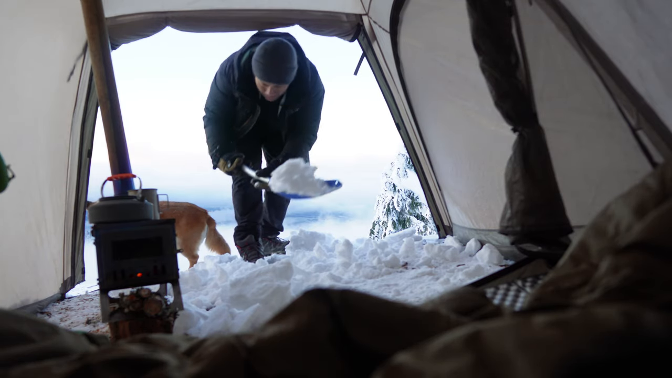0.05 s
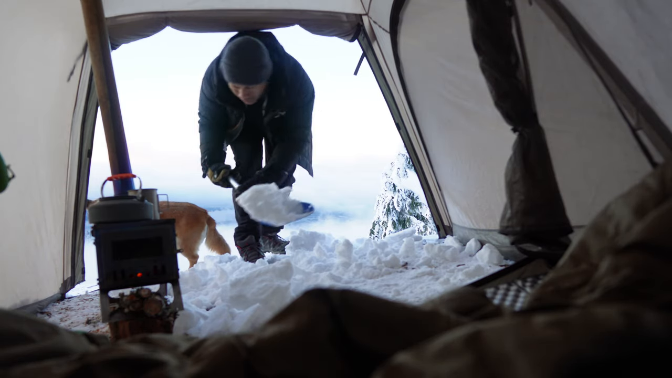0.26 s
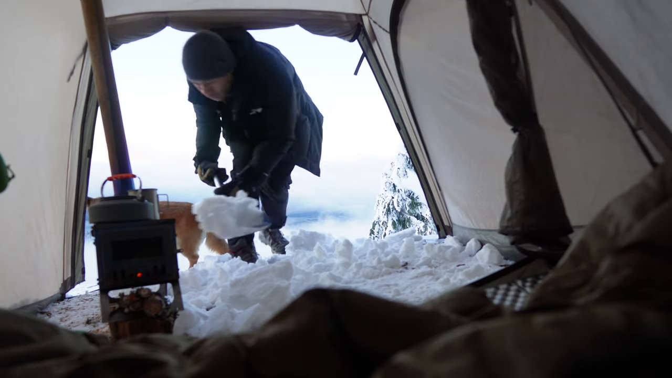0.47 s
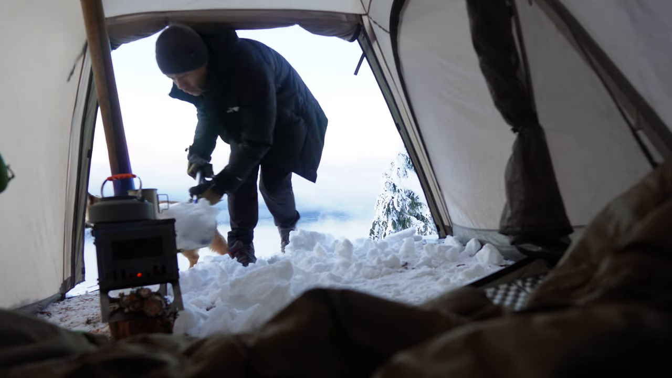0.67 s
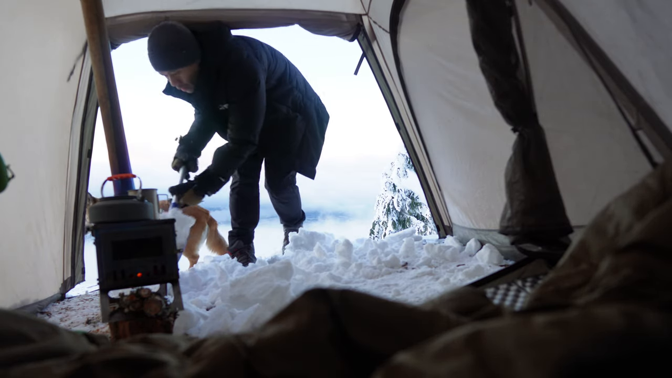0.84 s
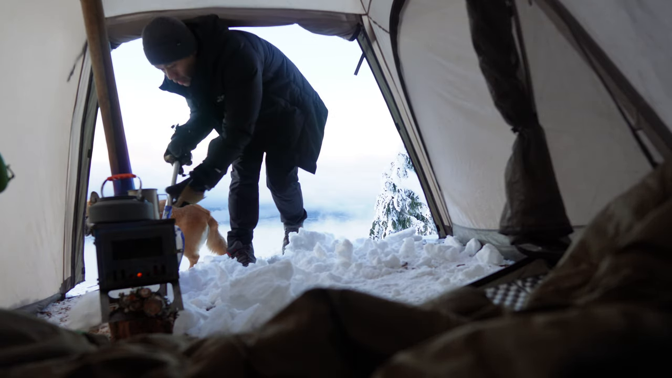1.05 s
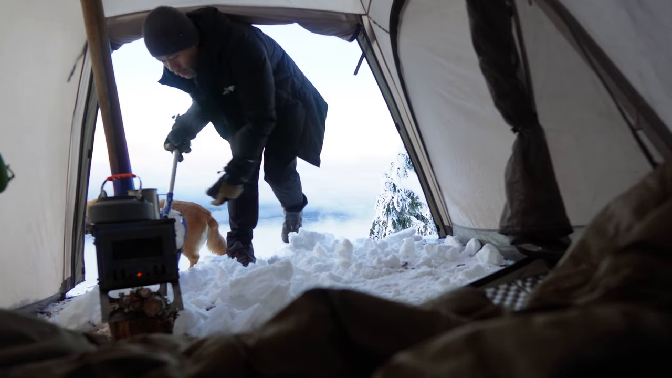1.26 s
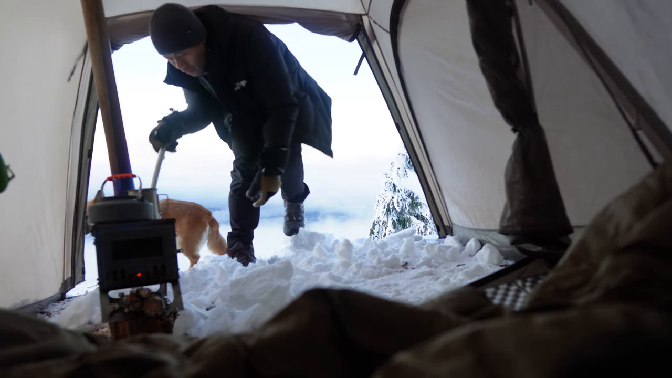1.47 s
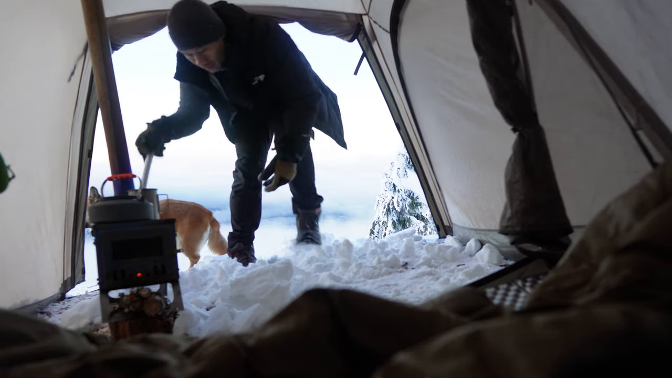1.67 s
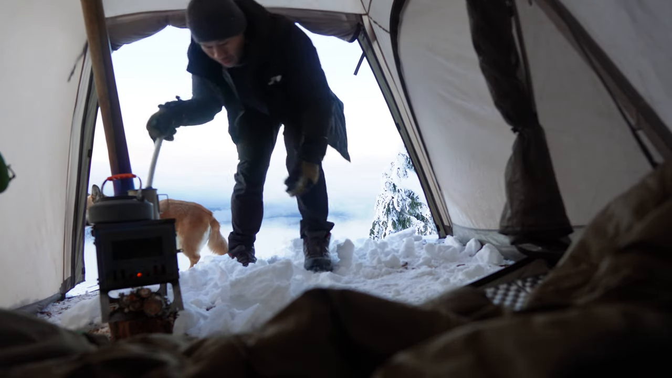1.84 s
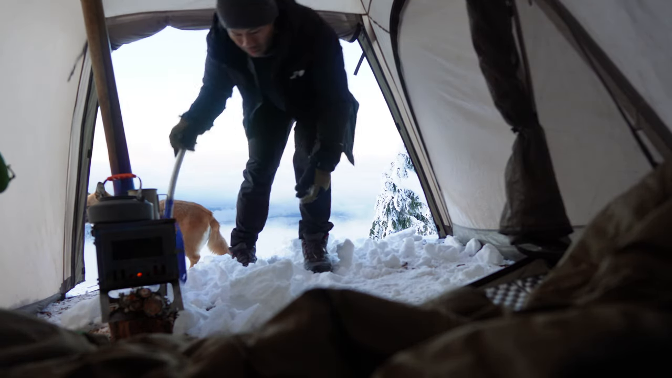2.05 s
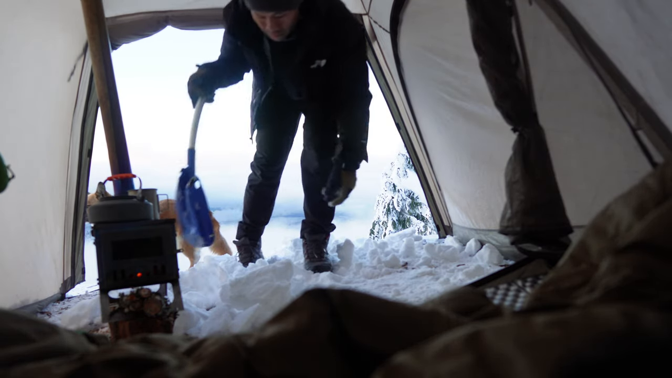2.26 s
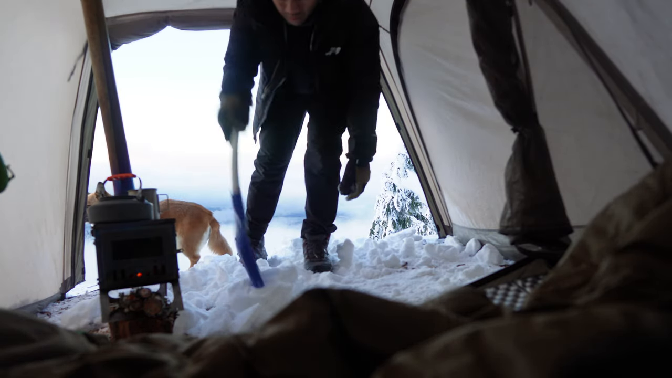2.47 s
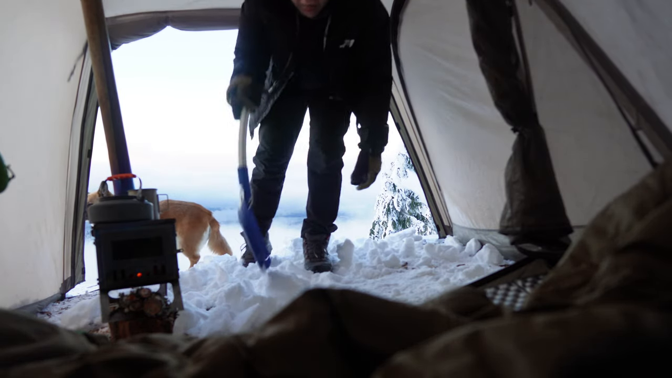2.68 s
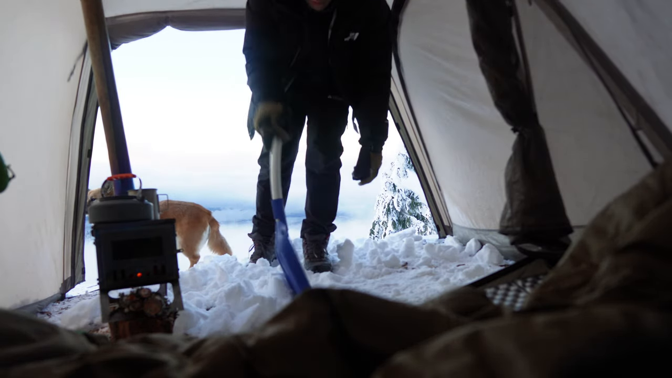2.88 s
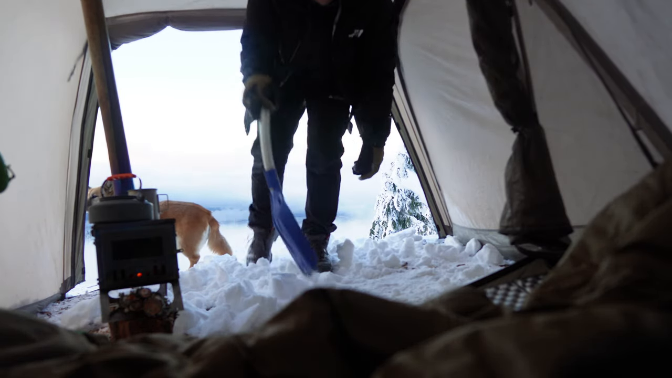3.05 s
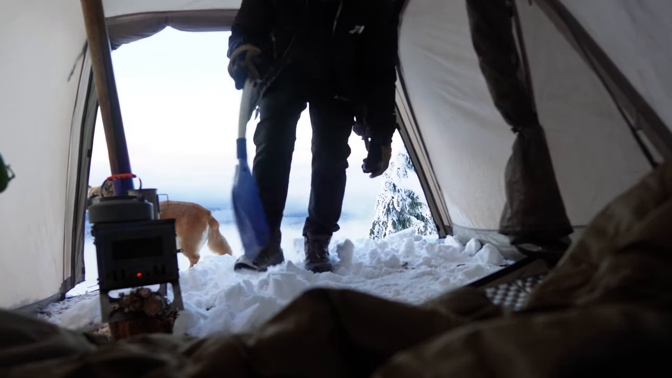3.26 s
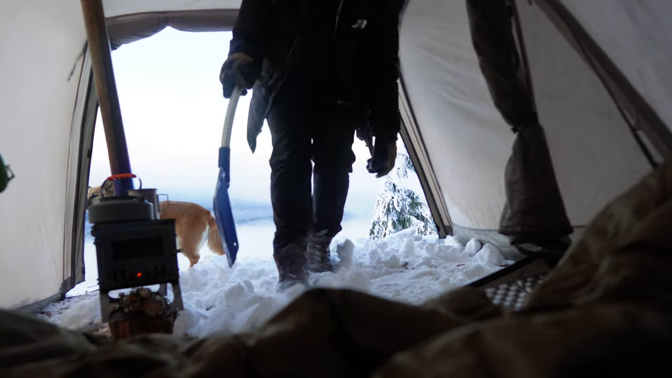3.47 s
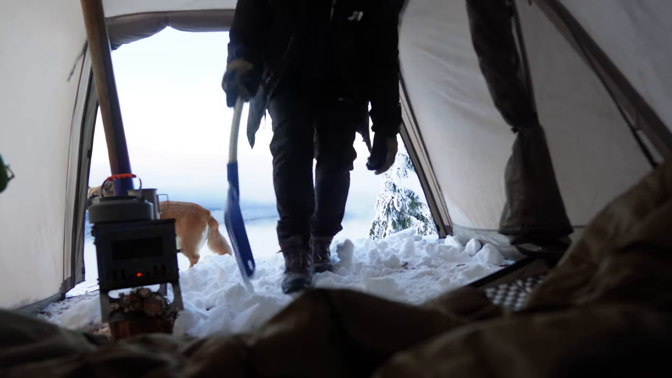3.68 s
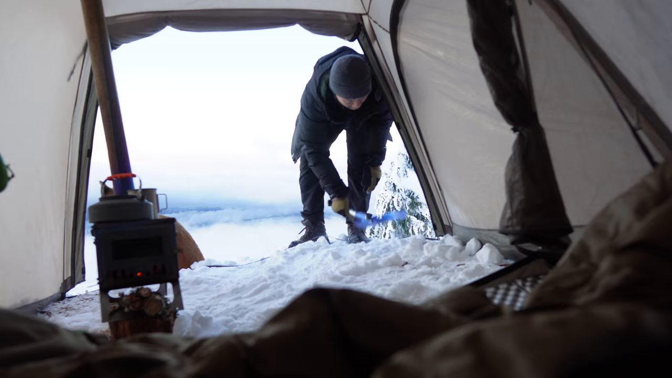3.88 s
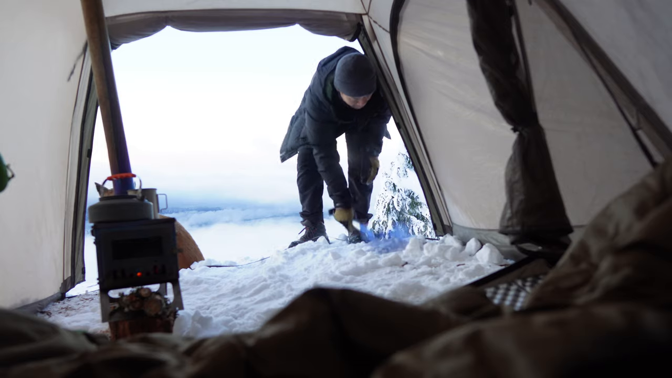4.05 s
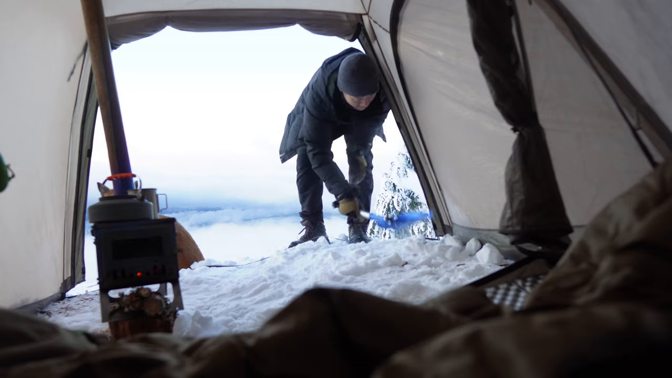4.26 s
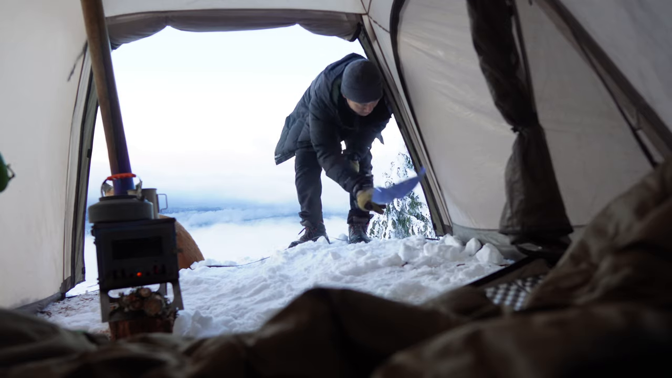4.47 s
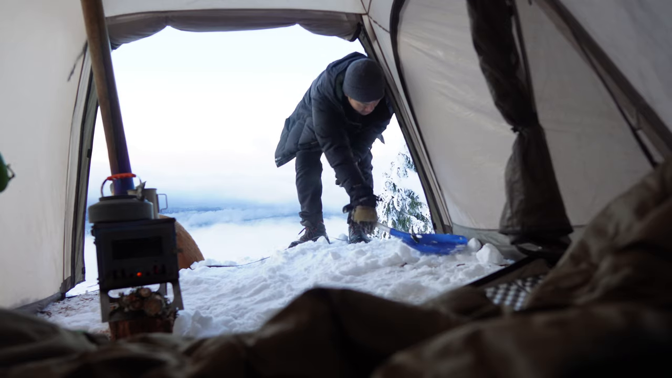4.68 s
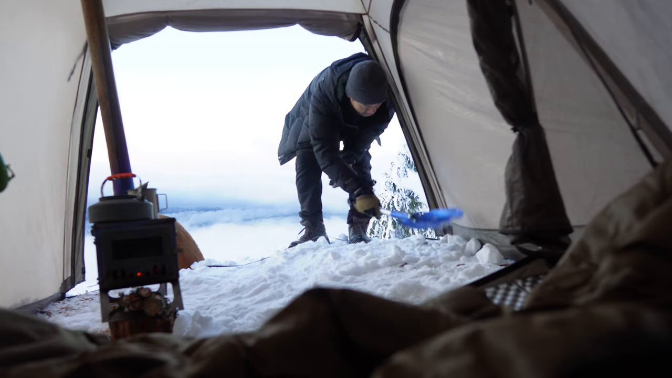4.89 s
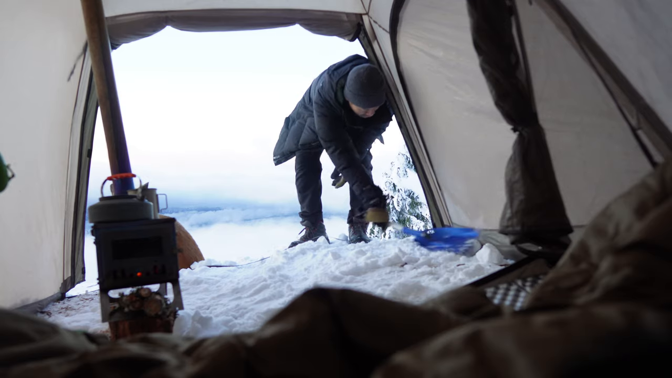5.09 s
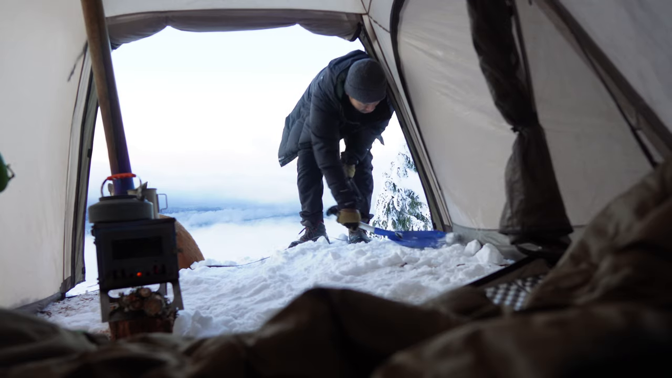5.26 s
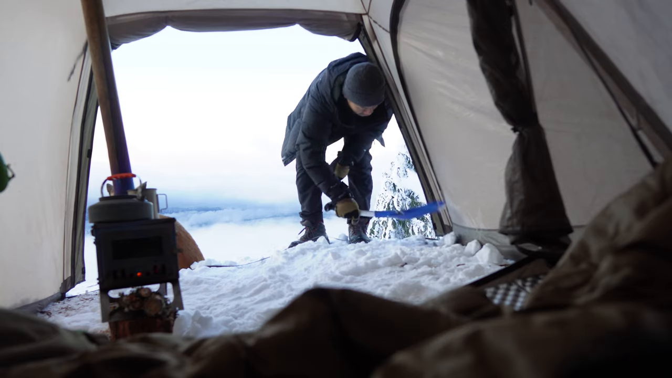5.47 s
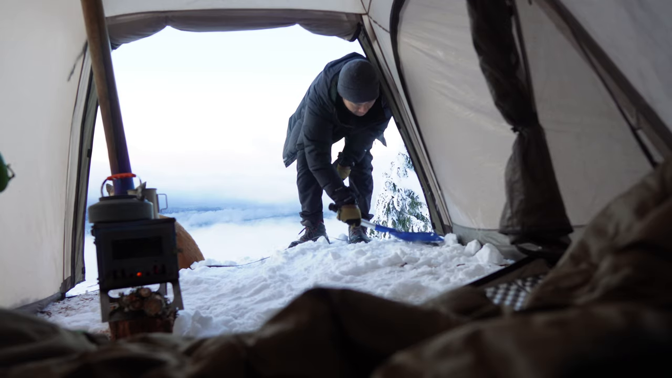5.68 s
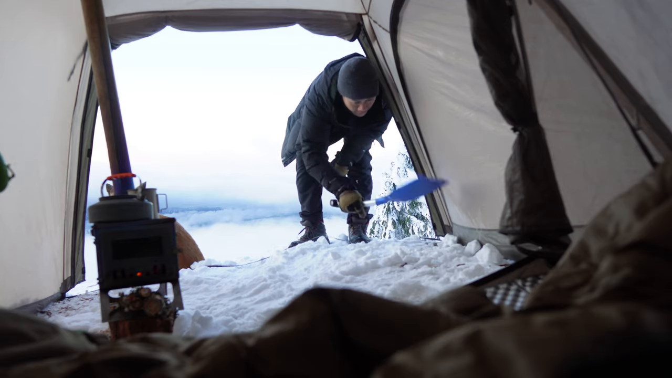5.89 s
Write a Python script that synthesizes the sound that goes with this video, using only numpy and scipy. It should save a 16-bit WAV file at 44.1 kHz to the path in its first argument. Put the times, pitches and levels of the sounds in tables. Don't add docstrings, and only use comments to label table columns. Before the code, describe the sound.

Close, dry mono pickup from inside a canvas tent in still winter air. For about a second and a half only faint snow rustles, soft boot crunches and light blade touches. Then a metal shovel bites hard into crusty snow, scraping and chopping irregularly, with short metallic rings, ice snaps and low thuds, growing busiest towards the end before dying away.

```python
import sys
import numpy as np
from scipy import signal
from scipy.io import wavfile

SR = 44100
rng = np.random.default_rng(int(sys.argv[2]) if len(sys.argv) > 2 else 0)


def wrap_up_sound(samples):
    columns = np.atleast_2d(samples).T
    tamed = np.clip(columns, -1, 1)
    steps = np.round(tamed * 32767).astype(np.int16)
    wavfile.write(sys.argv[1], SR, steps)


def gain_from_decibels(decibels):
    exponent = np.asarray(decibels, float) / 20
    return 10 ** exponent


N = 261513

# [t/s, peak level/dB, body re peak/dB, sparkle re peak/dB]
EDGE_BITES = [(1.5365, -14.5, -9, -37), (1.625, 5, -13, -36), (2.024, 2.5, -45, -27.5),
              (2.43, -14.5, -34, -21), (2.582, -1, -24, -22), (2.6016, -5.5, -16.5, -21),
              (2.808, -17.5, -13, -31), (2.9517, 1.5, -17, -17.5), (3.2845, -17, -11, -18.5),
              (3.5648, -13, -15, -40), (3.7534, -9.5, -21, -32), (3.7818, -8.5, -15, -10.5),
              (3.8488, 2, -16.5, -24.5), (3.9983, -10, -10, -27.5), (4.133, -3.5, -17, -16.5),
              (4.228, -1.5, -13.5, -22.5), (4.4217, -6, -21, -27.5), (4.678, -1.5, -18, -9.5),
              (4.7452, -8.5, -17, -16), (4.79, -13, -31, -22), (4.8182, -5.5, -8, -18.5),
              (5.1237, -5.5, -11.5, -36), (5.162, -2.5, -14, -24), (5.263, -12.5, -14, -10),
              (5.39, -5.5, -8.5, -17), (5.452, -17, -22, -9.5), (5.531, -7.5, -10.5, -23.5),
              (5.6523, 5.5, -25, -27), (5.701, -10.5, -21, -18), (5.7298, -4.5, -15, -24)]
# [t/s, peak level/dB, sparkle re peak/dB]
EDGE_TAPS = [(0.829, -26.5, -51), (0.9285, -23, -34), (0.9444, -26, -32), (1.121, -19, -9.5),
             (1.198, -28, -10), (1.462, -21, -41), (2.7602, -16.5, -39), (3.0596, -17, -31),
             (3.201, -28, -39), (3.248, -31, -36), (3.3737, -28, -2), (4.066, -22.5, -36), (4.343, -40, 1),
             (4.5164, -18, -45), (4.6144, -24.5, -44), (5.07, -25, -33), (5.854, -32, -38),
             (5.9254, -25, -51)]
# [t/s, level/dB]
BLADE_FREEDOM = [(0, -9.5), (1.4, 0), (2.4, 2.5), (2.6, -2.5), (2.88, 4), (3.0, 2), (3.3, 7), (3.45, -0.5),
                 (3.7, -3), (3.85, 3), (5.1, 3), (5.3, 7), (5.93, -6)]


def in_time(rows):
    s, *columns = np.transpose(rows)
    t = np.arange(N) / SR
    return np.array([np.interp(t, s, column) for column in columns])


def at_hz(points, hz):
    table_hz, table_db = np.array(points).T
    return np.interp(np.log(hz), np.log(table_hz), table_db)


def drift(rate_hz):
    r = np.exp(-32 * np.pi * rate_hz / SR)
    noise = rng.standard_normal(N // 16 + 2002)
    slow = signal.lfilter([1], [1, -2 * r, r * r], noise)[2000:]
    return np.interp(np.arange(N) / 16, np.arange(len(slow)), slow / slow.std())


def resonate(x, hz, width_hz):
    r = np.exp(-np.pi * width_hz / SR)
    poles = [1, -2 * r * np.cos(2 * np.pi * hz / SR), r * r]
    return signal.lfilter([(1 - r * r) / 2, 0, (r * r - 1) / 2], poles, x)


def add(out, s, piece):
    i = round(s * SR)
    out[..., i:i + piece.shape[-1]] += piece[..., :out.shape[-1] - i]


def zone_powers(edge_db, body_db, sparkle_db):
    zones_db = np.array([body_db + 15.0, body_db + 12.5, edge_db, sparkle_db + 12, sparkle_db + 13.0])
    return gain_from_decibels(2 * zones_db)


def sliding():
    # [t/s, level/dB, dryness (adds sparkle)/dB]
    settling = [(0.07, -34.5, -17), (.17, -38, -18), (.26, -44, -4), (.62, -38.5, -3.5), (.8, -43, -2),
                (1.3, -41.5, 2.5), (1.52, -43.5, 3), (2.44, -36, -1.5), (2.7, -40, -1.5), (3.1, -39.5, -4),
                (3.35, -47.5, 3), (3.55, -40.5, 1.5), (3.75, -36.5, -3), (3.93, -52, -15), (4.12, -54, -8),
                (4.5, -44.5, -3.5), (5.11, -44, -19), (5.6, -51, -12)]
    # [start/s, length/s, level/dB, body re level/dB, sparkle re level/dB]
    drags = [(0.0, 0.029, -30.5, -11.5, -18.5), (0.335, 0.22, -35.5, -14.5, -33),
             (0.723, 0.022, -37, -31, -22), (0.97, .06, -38.5, -24, -25), (1.05, 0.13, -33.5, -16, -17.5),
             (1.599, 0.016, -19.5, -32, -20.5), (1.686, 0.15, -28.5, -18.5, -14.5),
             (1.845, .2, -28.5, -8, -15), (3.41, 0.074, -39.5, -8.5, -20), (2.045, 0.13, -26, -19.5, -20.5),
             (2.154, 0.15, -34.5, -6.5, -10.5), (2.85, .04, -29.5, -31, -33),
             (2.919, 0.073, -19, -20.5, -29), (3.433, 0.045, -29.5, -10, -17.5),
             (4.024, 0.053, -36, -12.5, -22.5), (5.201, 0.15, -19.5, -21.5, -18),
             (5.713, 0.065, -26, -39, -21)]
    rise_db_per_s, fall_db_per_s, sag_db_per_s = 293, 235, -7.5
    usual_db, body_db, sparkle_db = -42.5, -52, -15.5

    level_db, dryness_db = in_time(settling)
    power = zone_powers(level_db, body_db + level_db - usual_db, level_db + sparkle_db + dryness_db)
    t = np.arange(-SR // 4, SR * 3 // 4) / SR
    padded = np.zeros((len(power), N + SR))
    for s, length_s, db, drag_body_db, drag_sparkle_db in drags:
        rise_db = rise_db_per_s * np.minimum(t, 0)
        sag_db = sag_db_per_s * np.maximum(t, 0)
        fall_db = fall_db_per_s * np.maximum(t - length_s, 0)
        shape_db = db + rise_db - sag_db - fall_db
        zones = zone_powers(0, drag_body_db, drag_sparkle_db)[:, None]
        add(padded, max(s, 0), gain_from_decibels(2 * shape_db) * zones)
    return power + padded[:, SR // 4:SR // 4 + N]


def pressure_db(bite_push_s, crump_db, fizz_db):
    # [t/s, peak level/dB, body re peak/dB, sparkle re peak/dB, t60/s]
    shoves = [(1.0744, -19.5, -13, -22, 0.12), (1.5666, -11.5, -14.5, -26, 0.31),
              (1.6494, -4.5, -19, -28, 0.018), (1.9796, 2, -31, -26.5, 0.19), (2.044, -21.5, 2, -11, 0.032),
              (2.4952, 1.5, -27, -20, 0.19), (2.5374, -2.5, -31, -32, 0.13), (2.6244, -16, -16, -27, 0.17),
              (2.846, -8.5, -21, -12.5, 0.28), (2.884, -12.5, -16.5, -20, 0.17),
              (2.9754, -2.5, -18, -22, 0.049), (3.395, -21.5, -26, -6, 0.2), (3.4426, -27, 0.5, -19, 0.15),
              (3.7964, -4, -45, -32, 0.12), (4.1447, -7.5, -11, -16.5, 0.16), (4.2044, -13, -20, -24, 0.1),
              (4.2694, -15.5, -27, -15.5, 0.13), (4.3824, -27.5, -26, -11, 0.097),
              (4.6906, -4, -19, -19.5, 0.31), (4.999, -20.5, -6, -28, 0.16), (5.135, -6, -18, -9.5, 0.16),
              (5.203, -10, -17.5, -35, 0.27), (4.672, -16, -10, -25, .05), (2.49, -24, -25, -20, .05),
              (2.838, -15, -17, -15, .05), (5.4144, -27, -26, -17, 0.15), (5.565, -24, -16, -30, .1),
              (5.7683, -14.5, -27, -14.5, 0.043)]
    bite_t60_s, tap_t60_s, tap_body_db = 0.091, 0.074, -11
    bite_rise_s, shove_rise_s, shove_push_s = .0018, .005, .019

    power = sliding()
    t = np.arange(SR // 2) / SR
    fading = np.array([[.9], [.9], [1], [1.15], [1.2]])
    bites = [(*row, bite_t60_s) for row in EDGE_BITES]
    bites += [(s, db, tap_body_db, sparkle_db, tap_t60_s) for s, db, sparkle_db in EDGE_TAPS]
    for rows, rise_s, push_s in (bites, bite_rise_s, bite_push_s), (shoves, shove_rise_s, shove_push_s):
        for s, db, body_db, sparkle_db, t60_s in rows:
            decay = gain_from_decibels(-60 * fading * np.maximum(t - push_s, 0) / max(t60_s, .01))
            shape = (1 - np.exp(-t / rise_s)) * decay
            low_db, high_db = body_db + 13, sparkle_db + 13.5
            zones_db = np.array([[low_db + crump_db], [low_db], [0], [high_db], [high_db + fizz_db]])
            add(power, s - .0025, (shape * gain_from_decibels(db - 8 + zones_db)) ** 2)
    return 10 * np.log10(power)


def crunch(strength_db, cycles, uneven_db, clump_db, patchy_db, blotchy_db, chip_db, fine):
    # [f/Hz, level per Hz/dB]
    spectrum = [(71, -35), (120, -21), (217, -8), (301, -7), (427, -7.5), (535, -12), (1030, -4.5),
                (1490, -9), (1830, -4.5), (2990, -2.5), (3520, -2.5), (5190, -3), (7980, -4.5),
                (14400, -24), (16000, -12)]
    zone_hz = [220, 850, 3200, 11000, 16000]
    # [t/s, power]
    thinness_curve = [(0, 1.4), (1.0, 1.7), (1.6, 0.89), (2.0, 1.25), (2.2, 1.2), (2.45, 2.9), (2.68, 3),
                      (2.85, 0.97), (3.3, 1.2), (3.7, 1.6), (4.1, 1.4), (4.7, 2), (5.12, 1.2), (5.3, 1.6),
                      (5.65, 1.1), (5.93, 1)]
    cracks_per_s = 40000

    pitches_hz = np.geomspace(130, 16500, 40)
    dealt = rng.integers(0, len(pitches_hz), N)
    clumps_db = clump_db * drift(55)
    sizes = gain_from_decibels(uneven_db * np.minimum(rng.exponential(1, N), 5)) * rng.choice([-1, 1], N)
    cracks = sizes * (rng.random(N) < cracks_per_s / SR)
    rarity = rng.random(N)
    thinness = np.clip(in_time(thinness_curve)[0], .5, 4)
    gains = gain_from_decibels(at_hz(spectrum, pitches_hz))
    gains = .92 * gains / np.sqrt(np.sum(gains ** 2 * pitches_hz / cycles * np.pi / SR))
    out = 0
    for k, hz in enumerate(pitches_hz):
        place = np.interp(np.log(hz), np.log(zone_hz), np.arange(len(zone_hz)))
        low = min(int(place), len(zone_hz) - 2)
        upper = (place - low) ** (thinness if low == 1 else 1)
        db = strength_db[low] * (1 - upper) + strength_db[low + 1] * upper
        own = cracks * (dealt == k) * (rarity < hz / 1800)
        own = own + fine * min(hz / 9000, 1) ** 2 * np.roll(sizes, 997 * k)
        level_db = db + clumps_db + patchy_db * drift(44) + blotchy_db * drift(4.1)
        own = own / own.std() * gain_from_decibels(level_db) + 1e-18
        chips = own * gain_from_decibels(chip_db + 8.2 * np.minimum(drift(8.9), 0.9))
        rings = resonate(own, hz, hz / cycles) + resonate(chips, 1.068 * hz, hz / 20)
        out = out + (-1) ** k * gains[k] * rings
    return out


def hollows(snow):
    # [middle/s, half length/s, f/Hz, level re crunch/dB]
    hollow_rows = [(0.323, 0.056, 2570, 0), (.54, 0.081, 2600, 3.5), (1.66, 0.011, 3240, 7),
                   (1.745, 0.071, 1260, 5), (2.2, 0.081, 1960, 7), (2.52, 0.035, 2350, 4),
                   (2.592, .012, 2160, 6), (3.8, 0.057, 3000, 1.5), (4.236, .04, 3080, 3),
                   (5.395, .015, 3000, 2), (5.218, 0.025, 3300, 0)]
    t = np.arange(N) / SR
    out = 0
    for s, half_s, hz, db in hollow_rows:
        swell = np.exp(-((t - s) / half_s) ** 2)
        out = out + gain_from_decibels(db) * resonate(snow * swell + 1e-18, hz, width_hz=240)
    return out


def snaps():
    # [t/s, peak level/dB]
    snap_rows = [(0.7309, -33.1), (1.022, -31.4), (1.1302, -16), (1.185, -30.1), (1.5681, -24.0),
                 (1.6565, -14.4), (1.6972, -23.7), (1.7423, -23.4), (2.2073, -24.0), (2.4331, -26.3),
                 (2.4997, -9), (2.583, -17.1), (2.6029, -8.8), (2.7632, -31.5), (2.9537, 0),
                 (2.9878, -11.3), (3.2875, -22.8), (3.3251, -32.9), (3.5784, -26), (3.7559, -23.6),
                 (3.8897, -32.7), (4.0, -26), (4.1349, -15.3), (4.2326, -15), (4.4244, -21.4),
                 (4.517, -33.5), (4.6801, -6.0), (4.7923, -22.3), (4.8227, -15), (5.1377, -9), (5.1484, -5),
                 (5.262, -14), (5.3922, -13.5), (5.4564, -19.8), (5.531, -16), (5.6537, -8),
                 (5.7103, -18.2), (5.7303, -15.9)]
    t60_s, level_db = 0.0015, -3
    out, t = np.zeros(N), np.arange(256) / SR
    bright = signal.butter(2, 5000, "high", fs=SR, output="sos")
    noise = rng.standard_normal((len(snap_rows), len(t)))
    for (s, db), hiss in zip(snap_rows, noise):
        burst = signal.sosfilt(bright, np.sign(hiss) * gain_from_decibels(-60 * t / t60_s))
        add(out, s - .0002, gain_from_decibels(db + level_db) * burst / np.abs(burst).max())
    return out


def blade(shaking, level_db, width_hz, widening):
    # [f/Hz, level/dB]
    modes = [(560, -19.5), (790, -27), (1365, -26.5), (1525, -23), (1960, -28.5), (2320, -23.5),
             (2440, -32.5), (2830, -43), (2990, -19.5), (3290, -19.5), (3700, -24.5), (4080, -23),
             (4390, -24.5), (4930, -19), (5450, -22.5)]
    shaking = shaking * gain_from_decibels(in_time(BLADE_FREEDOM)[0])
    out = 0
    for hz, db in modes:
        grip = gain_from_decibels(2.5 * drift(12))
        out = out + gain_from_decibels(db) * resonate(shaking * grip, hz, width_hz + widening * hz)
    return gain_from_decibels(level_db) * out


def struck_modes():
    # [f/Hz, level re bite/dB, t60/s]
    lasting = [(780, -39, 0.13), (1245, -37, 0.27), (1510, -35.5, 0.21), (1690, -41, 0.52),
               (1820, -47, 0.084), (2330, -25.5, 0.077), (2520, -31, 0.16), (2850, -28, 0.13),
               (3180, -36, 0.22), (3700, -37, 0.17), (3870, -37.5, 0.13), (563, -43.5, 0.3),
               (1420, -39.5, 0.29), (3400, -48, .1)]
    soft_bite_share, spread_db = 0.78, 3.0
    s, db = np.transpose([row[:2] for row in EDGE_BITES + EDGE_TAPS])
    where = (s * SR).astype(int)
    freedom_db = in_time(BLADE_FREEDOM)[0, where]
    chance = rng.standard_normal((len(s), len(lasting)))
    out = 0
    for (hz, level_db, t60_s), luck in zip(lasting, chance.T):
        clicks = np.full(N, 1e-18)
        clicks[where] = gain_from_decibels(soft_bite_share * db + level_db + spread_db * luck + freedom_db)
        r, w = gain_from_decibels(-60 / (t60_s * SR)), 2 * np.pi * hz / SR
        out = out + signal.lfilter([0, np.sin(w)], [1, -2 * r * np.cos(w), r * r], clicks)
    return out


def free_rings(sag_db, grip_t60_s):
    # [t/s, f/Hz, level/dB, gripped after/s]
    ring_rows = [(2.5, 3030, -9, 0.052), (2.848, 1532, -24, 0.08), (2.885, 1530, -20, .1),
                 (2.92, 1528, -21, .06), (2.872, 2960, -17, 0.12), (3.157, 2250, -33, .05),
                 (3.18, 2190, -35, .025), (4.238, 2850, -27, .11), (4.238, 3300, -22, .04),
                 (5.41, 1680, -31, .1), (5.575, 3280, -33, .04), (2.896, 4680, -21, 0.064),
                 (3.288, 1480, -26.5, 0.083), (3.288, 2450, -32, 0.059), (3.856, 1690, -31, 0.17),
                 (3.855, 3700, -19, 0.042), (4.234, 1245, -31, 0.14), (4.235, 557, -30, 0.066),
                 (4.72, 900, -28, 0.08), (4.827, 1240, -31, 0.19), (5.015, 2280, -29, 0.073),
                 (5.401, 1634, -29, 0.069), (5.742, 1430, -26.5, 0.079), (5.75, 2800, -34, 0.12),
                 (4.25, 1523, -33, 0.096), (4.3, 3661, -29.5, .05), (4.43, 1513, -31, 0.071),
                 (5.012, 1510, -33, 0.067), (5.4, 1520, -27.5, 0.094), (5.535, 1540, -34, 0.11),
                 (5.32, 1500, -32.5, 0.094), (3.255, 1500, -33, .04), (3.29, 2850, -25, 0.055),
                 (.4, 2500, -42, .15)]
    # [t/s, f/Hz, level/dB]
    pings = [(1.654, 3210, -11), (2.052, 1380, -23.5), (2.585, 780, -26), (2.815, 780, -26),
             (3.016, 1124, -27), (3.289, 1149, -22.5), (3.288, 2980, -20), (3.287, 5440, -20),
             (4.238, 2320, -18), (4.28, 3700, -21), (4.425, 2020, -19), (4.522, 2330, -29),
             (4.619, 1510, -31.5), (4.69, 1217, -17), (4.746, 4400, -13), (4.823, 3110, -20),
             (4.999, 4070, -25.5), (5.255, 2294, -18.5), (5.402, 2960, -22), (5.455, 4070, -18),
             (5.535, 2280, -19), (5.77, 3810, -17), (5.765, 4900, -25.5), (5.765, 2420, -25),
             (.551, 2590, -32.5), (1.62, 5030, -14), (1.988, 2920, -12), (2.045, 6750, -17),
             (2.084, 2940, -23), (2.582, 4392, -25), (2.602, 14211, -27), (2.602, 7400, -16),
             (2.602, 3130, -17), (2.76, 1490, -31), (2.847, 5140, -25), (2.978, 7150, -15),
             (3.754, 3830, -20), (3.782, 2350, -25), (3.85, 2120, -19), (4.232, 3000, -15),
             (4.424, 2240, -15), (4.425, 1123, -22.5), (4.429, 765, -32), (4.702, 2900, -27),
             (4.82, 962, -19), (5.01, 835, -26.5), (5.23, 1484, -25), (5.262, 4470, -23),
             (5.294, 4950, -21), (5.391, 3850, -19), (5.393, 1354, -21.5), (5.428, 4090, -24),
             (5.459, 3402, -26), (5.532, 1037, -29), (5.655, 2910, -13), (5.73, 3220, -25),
             (4.62, 1220, -34), (4.135, 4810, -13)]
    ping_gripped_s = 0.032
    out, t = np.zeros(N), np.arange(SR // 3) / SR
    rows = ring_rows + [(s, hz, db, ping_gripped_s * min(1, 4000 / hz)) for s, hz, db in pings]
    splits = rng.uniform(-0.98, 1, len(rows))
    for (s, hz, db, gripped_s), split in zip(rows, splits):
        twin = .45 * np.exp(-t / .06) * np.sin(2 * np.pi * hz * (1 + .03 * split) * t + 3 * split)
        damping_db = sag_db * t / gripped_s - 60 * np.maximum(t - gripped_s, 0) / grip_t60_s
        envelope = gain_from_decibels(db + damping_db) * (1 - np.exp(-t / 0.00018))
        add(out, s, envelope * (np.sin(2 * np.pi * hz * t) + twin))
    return out * gain_from_decibels(1.9 * drift(110))


def thuds(puff, crackle):
    # [middle/s, peak level/dB, f/Hz, half length/s]
    landings = [(1.624, -14.5, 320, 0.0052), (2.025, -10.5, 450, 0.00095), (2.032, -13.5, 237, 0.0028),
                (2.957, -20.5, 500, 0.0033), (3.856, -25.5, 510, 0.024), (3.857, -23, 298, 0.01),
                (4.14, -2.5, 224, 0.0024), (4.075, -28, 510, 0.0028), (4.234, -13, 534, 0.0061),
                (4.685, -15, 310, 0.007), (4.828, -28, 485, 0.012), (5.176, -19, 125, 0.009),
                (5.143, -20, 125, .008), (5.682, -28, 240, .009), (5.161, -3, 566, 0.0016),
                (5.169, -19.5, 252, 0.014), (5.188, -9.5, 160, 0.0023), (5.397, -21, 770, 0.0083),
                (5.658, -16.5, 530, 0.0042), (5.66, -24, 284, 0.012), (5.733, -21.5, 520, 0.0056),
                (5.928, -20.5, 1500, 0.00034), (1.665, -23.5, 340, 0.0045), (1.628, -23.5, 120, 0.0076),
                (4.69, -24.5, 193, 0.006), (5.66, -27, 106, 0.0071), (2.512, -26, 775, 0.013),
                (2.52, -27, 430, 0.0065), (5.175, -18, 510, 0.005), (3.3, -31, 1000, .008)]
    # [middle/s, peak level/dB, f/Hz]
    pops = [(0.095, -27.5, 253), (.1, -30, 700), (.152, -27, 520), (0.165, -25, 534), (0.246, -33.5, 1150),
            (0.371, -27.5, 197), (0.397, -37, 242), (0.418, -23, 182), (0.431, -27, 454), (.468, -29, 244),
            (0.557, -26, 560), (0.585, -20, 515), (0.591, -20, 454), (0.944, -31, 794), (1.857, -25.5, 510),
            (1.879, -20.5, 447), (1.926, -25, 560), (1.975, -20, 546), (1.997, -19, 530), (2.238, -26, 227),
            (2.282, -21.5, 473), (2.306, -24, 213), (2.32, -29, 427), (3.392, -24.5, 438),
            (3.426, -31, 695), (3.449, -21.5, 437), (3.476, -22.5, 390), (3.503, -25, 725),
            (3.555, -23.5, 634), (0.668, -35, 705), (.27, -36.5, 587), (.647, -32, 517), (.659, -36, 450),
            (.689, -35, 462), (.83, -38, 503), (1.054, -35, 503), (1.08, -36, 380), (1.836, -31, 226),
            (1.956, -27, 520), (2.104, -35, 248), (2.16, -36, 197), (3.125, -31.5, 247), (3.208, -30, 200),
            (3.209, -33.5, 1050), (3.278, -32, 450), (3.375, -32.5, 350), (3.459, -23, 563),
            (3.466, -27, 794), (3.489, -26, 704), (3.512, -31, 350), (3.567, -30.5, 616), (3.705, -36, 458),
            (3.737, -31, 261), (5.855, -32, 1600), (5.891, -42, 750), (.57, -32, 885)]
    pop_half_s = 0.003
    out, t = np.zeros(N), np.arange(-2048, 2048) / SR
    rows = [(*row, puff) for row in landings]
    rows += [(s, db, hz, pop_half_s * min(1, 550 / hz), crackle) for s, db, hz in pops]
    noise = rng.standard_normal((len(rows), len(t)))
    stretch = np.where(t < 0, 0.83, 1.2)
    for (s, db, hz, half_s, share), hiss in zip(rows, noise):
        dull = resonate(resonate(hiss, 2 * hz, 3 * hz), 2 * hz, 7 * hz)
        tone = np.sin(2 * np.pi * hz * t) + share * dull / dull.std()
        add(out, s + t[0], gain_from_decibels(db) * np.exp(-(t / half_s / stretch) ** 2) * tone)
    return out


def canvas_echo(near):
    echo = np.zeros(N)
    add(echo, .0065, gain_from_decibels(-19.5) * signal.lfilter([.4], [1, -.6], near))
    return echo


def air(patchy_db):
    # [f/Hz, level per Hz/dB]
    air_spectrum = [(12, -32), (25, 10), (120, 15.5), (718, -10), (1960, -6), (2750, -27), (5230, -15),
                    (6360, -73), (10800, -8), (16000, -32)]
    edges_hz = 20 * 2 ** np.arange(0, 10, .5)
    white = rng.standard_normal((2, N))
    out = 0
    for k, (low, high) in enumerate(zip(edges_hz, edges_hz[1:])):
        band_pass = signal.butter(2, [low, high], "band", fs=SR, output="sos")
        band = signal.sosfilt(band_pass, white[k % 2])
        flicker_db = patchy_db * min(low / 400, 1) * np.tanh(drift(27))
        out = out + gain_from_decibels(at_hz(air_spectrum, np.sqrt(low * high)) + flicker_db) * band
    return gain_from_decibels(-47) * out / out.std()


def scene():
    strength_db = pressure_db(bite_push_s=0.0078, crump_db=-5.0, fizz_db=-7.0)
    snow = crunch(strength_db, cycles=4.0, uneven_db=2.2, clump_db=1.1, patchy_db=1.0,
                  blotchy_db=1.5, chip_db=-6.5, fine=.09)
    near = snow + hollows(snow) + snaps()
    near = near + blade(snow, level_db=20.5, width_hz=15.4, widening=0.012)
    near = near + struck_modes() + free_rings(sag_db=-15.5, grip_t60_s=0.046)
    near = near + thuds(puff=0.28, crackle=0.45)
    return (near + canvas_echo(near) + air(patchy_db=10.0))[None]


def top_cut(x):
    return signal.sosfilt(signal.butter(12, 16660, fs=SR, output="sos"), x)


def record(dry):
    rounded = 1.001 * np.tanh(dry / 1.397)
    low_pass = signal.cheby2(20, 45, 15880, fs=SR, output="sos")
    return top_cut(signal.sosfilt(low_pass, rounded))


dry = scene()
out = record(dry)
wrap_up_sound(out)
```